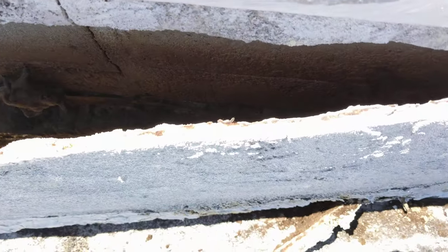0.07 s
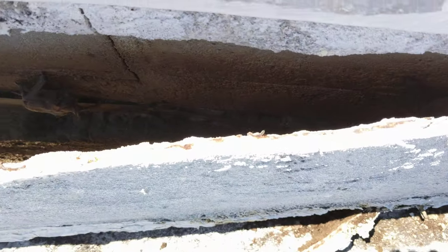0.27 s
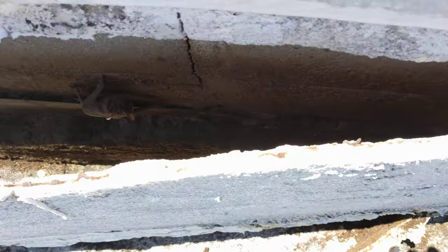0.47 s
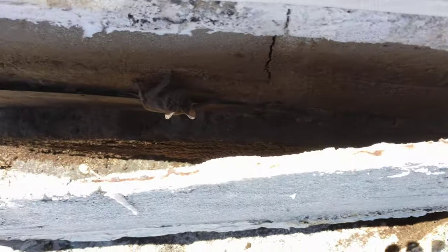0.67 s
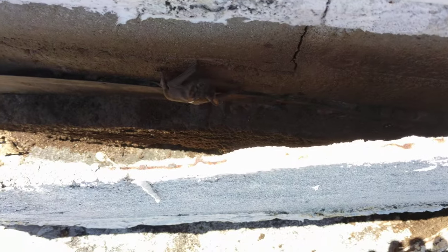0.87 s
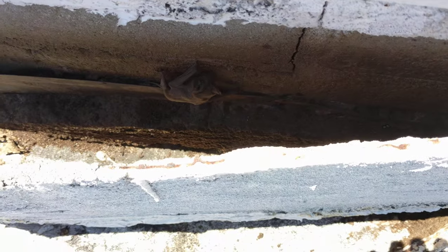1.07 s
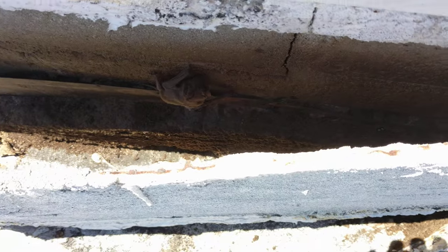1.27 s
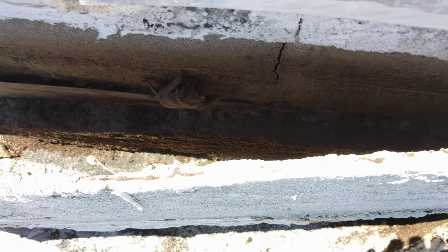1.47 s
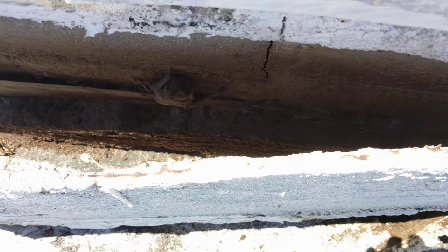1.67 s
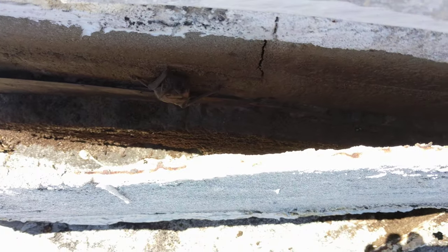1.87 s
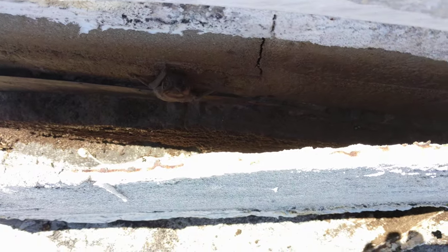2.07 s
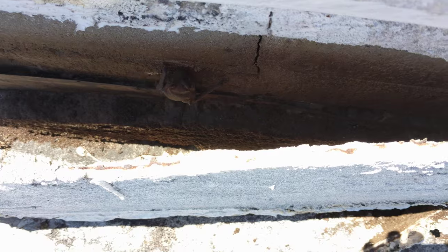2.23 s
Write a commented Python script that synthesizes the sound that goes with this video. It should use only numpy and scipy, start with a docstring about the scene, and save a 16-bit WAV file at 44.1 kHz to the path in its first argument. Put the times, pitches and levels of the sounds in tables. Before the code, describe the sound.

A bat squeaks close by in a narrow gap under a roof edge. Thin chirps come first, then raspy squeaks that turn short and clean. Its claws scratch faintly, and small thumps jolt the microphone over a low rumble.

```python
"""Bat scolding under a roof edge

A bat in a narrow gap squeaks close by, using thin membranes in its voice box. Its first squeaks are
long and break into a rasp, the later ones short and clean, with thin chirps and whistles around them.
Its claws scratch, small knocks jolt the microphone, and a low background rumble and two far peeps lie
behind."""
import sys
import numpy as np
from scipy import signal
from scipy.fft import rfft, irfft
from scipy.io import wavfile

SR = 44100
rng = np.random.default_rng(int(sys.argv[2]) if len(sys.argv) > 2 else 0)


def dump(signal):
    """Clip the signal to [-1, 1] and save it as 16-bit WAV at the path in sys.argv[1]."""
    limited = np.clip(np.atleast_2d(signal).T, -1, 1)
    pcm = np.round(limited * 32767).astype(np.int16)
    wavfile.write(sys.argv[1], SR, pcm)


N = 101429

# Tone colour of the rasp in the bat's throat: f/Hz, relative level/dB
RASP_COLOUR = [(1000, -13.5), (2000, -12.5), (2800, -12), (4200, -4), (4950, -18.5), (5600, -8.5),
               (6600, -21.5), (7900, 0), (9300, -4.5), (10700, 0), (12200, -8), (14000, 6.5), (15800, -0.5),
               (17000, -37)]
FADE_S = 0.00189  # fade at each end of a squeak or whistle
JITTER_HZ, WOBBLE_HZ = 670, 172  # speeds of the fast and the slower shaking of a voice


def squeak(length, from_hz, to_hz, db, octave_db, treble_db, rough, swell_db):
    """Voice membranes sing an arched glide; under strain they shake, add in-between tones and rasp."""
    # How the throat colours the high overtones: f/Hz, gain/dB
    throat = [(7500, -29), (9500, -9.5), (10500, -19.5), (12000, -7), (13200, -16), (14500, -3),
              (15600, -11), (17000, -40)]
    progress, fade = note_shape(length)
    n = len(progress)
    glide = from_hz + (to_hz - from_hz) * progress ** 0.745
    arch = np.sqrt(fade * np.sin(np.pi * progress).clip(0)) - np.pi / 4
    jitter = 0.06 * rough * drift(JITTER_HZ, n)
    wobble = 0.05 * np.sqrt(rough) * drift(WOBBLE_HZ, n)
    hz = glide * (1 + 0.019 * arch) * (1 + jitter + wobble)
    core = tone(hz) + amp(octave_db) * tone(2 * hz)
    overtones = sum(gain_at(throat, k * hz) * (k * hz < SR / 2) * tone(k * hz) for k in range(3, 7))
    # A strained voice splits into extra tones at thirds of its pitch.
    thirds = [k / 3 for k in range(2, 15) if k % 3]
    split = sum(gain_at(RASP_COLOUR, k * hz) * drift(WOBBLE_HZ, n) * tone(k * hz) for k in thirds)
    rasp = amp(2) * noise(RASP_COLOUR, n) + 0.44 * split
    treble = np.sqrt(1 - rough ** 2) * overtones + (rough + 0.05) * rasp
    flutter = unit(amp(1.5 * np.sqrt(rough) * drift(rate_hz=350, size=n)))
    loudness = amp(db + swell_db * (progress - 0.5)) * fade * flutter
    return loudness * (core + amp(treble_db) * treble)


def chirp(length, end_hz, db, top_hz=16200):
    """A thin call that dives from the upper edge of hearing, with a little rasp."""
    n = round(length * SR)
    progress = np.linspace(0, 1, n)
    hz = end_hz + (top_hz - end_hz) * (1 - progress) ** 2.1
    sweep = tone(hz * (1 + 0.021 * drift(JITTER_HZ, n)))
    fade = np.sin(np.pi * progress ** 0.62) ** 2
    return amp(db) * fade * (sweep + amp(-15) * noise(RASP_COLOUR, n))


def whistle(length, ends_hz, low_hz, db):
    """A thin, pure note whose pitch sags and rises again."""
    progress, fade = note_shape(length)
    hz = low_hz + (ends_hz - low_hz) * (2 * progress - 1) ** 2
    return amp(db) * fade * tone(hz * (1 + 0.025 * drift(JITTER_HZ, len(hz))))


def scratch(decay_s, db):
    """A claw catches on the rough wall and makes a dying puff of noise."""
    # Tone colour of a claw on the wall: f/Hz, relative level/dB
    claw_colour = [(300, -27), (1200, 12), (2600, 8), (5000, 2), (8000, -5.5), (12000, 0), (16000, -12.5)]
    t = np.arange(0, 2 * decay_s, 1 / SR)
    return amp(db) * np.exp(-2 * t / decay_s) * noise(claw_colour, len(t))


def gap_echo(sound, echo_db=-23, ring_s=0.053):
    """Sound bounces between the close walls, which adds a very short ring."""
    t = np.arange(SR // 10) / SR
    tail = rng.standard_normal(len(t)) * die_away(t, ring_s)
    return sound + amp(echo_db) * signal.fftconvolve(sound, tail / np.linalg.norm(tail))[:N]


def knocks(bass_cut_hz=52.5, top_hz=4270, clack_s=1.8829):
    """Jolts are pressure steps that the microphone's bass cut turns into thumps; one cluster clacks."""
    # Jolts on the microphone: t/s, level/dB, push (+1) or pull (-1)
    jolts = [(.7565, -46, 1), (.8623, -16.5, 1), (0.9986, -35, 1), (1.7368, -39.5, -1), (1.7433, -22.5, 1),
             (1.8827, -21, 1), (1.88295, -19, -1), (1.8836, -30, 1), (1.8844, -32.5, 1), (1.898, -47, 1),
             (2.0195, -19, -1), (2.1781, -34.5, 1)]
    # Ringing tones of the clack: f/Hz, level/dB, time to fall by 60 dB/s
    clack_tones = [(1560, -42.5, 0.023), (2630, -67, 0.027), (3520, -32, 0.0091)]
    steps = np.zeros(N)
    for start, db, direction in jolts:
        add(steps, start, np.full(N, amp(db) * direction))
    thumps = signal.sosfilt(signal.butter(6, bass_cut_hz, "high", fs=SR, output="sos"), steps)
    thumps = signal.sosfilt(signal.butter(1, top_hz, fs=SR, output="sos"), thumps)
    t = np.arange(SR // 10) / SR
    for hz, db, ring_s in clack_tones:
        add(thumps, clack_s, amp(db) * die_away(t, ring_s) * np.sin(2 * np.pi * hz * t))
    return thumps


def peep(length, hz, db):
    """A soft, far-away note that rises and falls."""
    arch = np.sin(np.pi * np.linspace(0, 1, round(length * SR)))
    bend = 1 + 0.049 * (arch - 1) + 0.053 * drift(JITTER_HZ, len(arch))
    return amp(db) * arch * tone(hz * bend)


def background(hum_hz=74.8, hum_db=-58.5):
    """Background rumble and hiss, with a wavering low hum that swells along with the rumble."""
    # Tone colour of the background noise: f/Hz, relative level/dB
    colour = [(20, -73), (32, -20), (48, 1.5), (65, -3), (100, -1.5), (150, -3), (220, -9.5), (320, -11),
              (520, -16.5), (680, -19), (800, -16), (1050, -21), (1500, -20.5), (2000, -26), (3400, -27),
              (5700, -33.5), (8400, -36.5), (13800, -37.5), (15500, -35), (17000, -27.5)]
    # Its loudness in three bands, briefly ducking just after the last squeak:
    # t/s, low/dB, middle/dB, high/dB
    band_levels = [(0, -56, -60, -59.5), (.28, -52, -61, -67.5), (.45, -54, -60.5, -65.5),
                   (.62, -53.5, -59.5, -65), (.78, -59, -64.5, -68), (1.0, -56, -64, -66.5),
                   (1.2, -58.5, -65.5, -71), (1.5, -57, -63, -67), (1.7, -61, -65, -70.5),
                   (1.83, -61, -70.5, -72.5), (1.99, -58, -63.5, -70.5), (2.075, -63.5, -71.5, -79.5),
                   (2.15, -63.5, -65.5, -73), (2.25, -54, -61.5, -68), (2.3, -60, -63.5, -62.5)]
    edges_hz = (0, 300, 5000, SR)
    times, *levels = np.transpose(band_levels)
    gains = [amp(np.interp(np.arange(N) / SR, times, db)) for db in levels]
    bands = sum(gain * noise(colour, N, lo, hi) for gain, lo, hi in zip(gains, edges_hz, edges_hz[1:]))
    hum = tone(hum_hz * (1 + 0.0713 * drift(rate_hz=13.6, size=N)))
    return bands + amp(hum_db) * unit(gains[0]) * hum


def amp(db):
    """Turns decibels into a gain to multiply by."""
    return 10 ** (np.asarray(db) / 20)


def unit(x):
    """Scales a signal to an average strength (rms) of 1."""
    return x / np.sqrt(np.mean(x ** 2) + 1e-20)


def gain_at(colour, hz):
    """Looks up the gain of a tone colour at a frequency."""
    points_hz, db = np.transpose(colour)
    return amp(np.interp(np.log(hz + 1), np.log(points_hz + 1), db))


def add(mix, start_s, sound):
    """Mixes a sound in at a given time."""
    part = mix[max(round(start_s * SR), 0):][:len(sound)]
    part += sound[:len(part)]


def noise(colour, size, lo_hz=0, hi_hz=SR):
    """Noise with a given tone colour, between two frequencies."""
    span = max(size, 4096)
    hz = np.fft.rfftfreq(span, 1 / SR)
    spectrum = rfft(rng.standard_normal(span)) * gain_at(colour, hz)
    return unit(irfft(spectrum * (hz >= lo_hz) * (hz < hi_hz), span))[:size]


def drift(rate_hz, size):
    """A smooth random wander of about 1 either way; a higher rate makes it faster."""
    span = max(size, 8192)
    hz = np.fft.rfftfreq(span, 1 / SR)
    spectrum = rfft(rng.standard_normal(span)) * np.exp(-(hz / rate_hz) ** 2)
    return unit(irfft(spectrum, span))[:size]


def note_shape(length):
    """Progress from 0 to 1 through a note, and a curve that fades it in and out."""
    t = np.arange(0, length + FADE_S, 1 / SR)
    edge = np.clip(np.minimum(t, t[-1] - t) / FADE_S, 0, 1)
    return t / t[-1], np.sin(np.pi / 2 * edge)


def die_away(t, ring_s):
    """A fade that falls by 60 dB in ring_s seconds."""
    return np.exp(-np.log(1000) * t / ring_s)


def tone(hz):
    """A pure tone that follows a pitch curve."""
    return np.sqrt(2) * np.sin(2 * np.pi * np.cumsum(hz) / SR)


def scene(ticks_per_s=51):
    """The bat in its gap, with the knocks and the background, in mono."""
    # The bat's squeaks; rows that touch in time form one call: t/s, length/s, start f/Hz, end f/Hz,
    # level/dB, octave gain/dB, treble gain/dB, roughness (0-1), swell over the note/dB
    squeaks = [ (0.667, 0.012, 4300, 3910, -43.5, 5, 9, 0.17, -8),
               (0.679, 0.03, 4190, 3670, -55, -11.5, 13.5, 0.77, -5),
               (0.709, 0.013, 2650, 2570, -51.5, -13, 24, 0.07, 3),
               (0.723, 0.009, 3540, 3480, -56, -14, 20, 0.35, -4),
               (0.8244, 0.0087, 4370, 3860, -47.5, 7, 5, 0.18, 11),
               (0.8347, 0.011, 4240, 3970, -46.5, -9, 5, 0.65, -8),
               (0.846, 0.031, 4010, 3530, -48, -15, 9, 0.45, -10),
               (0.868, 0.012, 4080, 3940, -46.5, 1, -7, 0.17, 4),
               (0.881, 0.0098, 3600, 3780, -46.5, -8, -2, 0.6, -11),
               (1.0065, 0.013, 3800, 4370, -44.5, -5, 0.5, 0.24, -3),
               (1.020, .026, 3950, 4124, -46.5, -17, -2, 0.83, -4),
               (1.046, .013, 3680, 3550, -51, -7, -2, 0.4, -3),
               (1.1772, 0.0068, 3646, 3590, -45, -8, -1, 0.23, -7),
               (1.3189, .025, 3950, 3730, -50, -4, 9.5, 0.06, -9),
               (1.4623, 0.0047, 3430, 3200, -48, -12, -1, 0.5, 11),
               (1.473, 0.019, 3850, 3850, -43, 2.5, 9.5, 0.14, -0.5),
               (1.617, .016, 3960, 3670, -44.5, -3, 1, 0.29, -4.5),
               (1.632, 0.009, 3420, 3150, -50.5, -11, -2, 0.42, 5),
               (1.745, .028, 3650, 3570, -47.5, 0, 1.5, 0.2, -1.5),
               (1.774, 0.01, 3060, 3000, -52, -11, -1.5, 0.5, -13),
               (1.889, 0.0031, 4000, 3170, -50.5, 0, -2, 0.02, -8),
               (2.0325, 0.011, 3355, 3004, -50, -9.5, 1.5, 0.26, -5)]
    # Its falling chirps: t/s, length/s, end f/Hz, level/dB
    chirps = [(.031, 0.0033, 11100, -50), (.1175, 0.0043, 11800, -53), (.197, .005, 11700, -53.5),
              (.227, 0.008, 13800, -43), (.229, 0.008, 11700, -42.5), (.239, 0.019, 13700, -49),
              (.257, .004, 14500, -49), (.2675, 0.0074, 12500, -46.5), (.3295, 0.0038, 11900, -37.5),
              (.345, 0.0085, 14000, -48), (.426, 0.0082, 13700, -50), (.5455, .007, 13800, -43),
              (.571, 0.0056, 10900, -55), (.578, 0.0039, 10000, -52), (.586, 0.0074, 11500, -52),
              (.594, 0.0036, 11500, -60), (.639, .004, 12000, -55), (.646, .004, 12100, -58),
              (.653, 0.0026, 11300, -46), (.8385, 0.0085, 15100, -37), (1.076, .005, 15200, -73),
              (1.161, .006, 14800, -63), (1.439, .004, 11000, -58), (1.457, .005, 15000, -49),
              (1.629, .005, 14700, -34), (1.7555, 0.0058, 14800, -40), (1.7605, 0.0053, 14700, -33.5),
              (1.8893, 0.0066, 15400, -36), (1.926, 0.0075, 14800, -50), (2.0412, 0.0047, 14400, -34),
              (2.266, 0.0046, 10800, -49), (2.282, 0.003, 14200, -42)]
    # Its whistles: t/s, length/s, f at both ends/Hz, lowest f/Hz, level/dB
    whistles = [(.359, 0.0075, 10900, 10200, -54), (1.455, 0.022, 16300, 13100, -50),
                (1.567, 0.017, 14200, 12700, -63), (1.607, 0.017, 13100, 12100, -47.5),
                (1.640, 0.019, 13100, 11900, -55.5), (1.778, 0.018, 13600, 10300, -58)]
    # Its claw scratches: t/s, decay/s, level/dB
    scratches = [(.0585, 0.0028, -44.5), (.077, 0.0087, -49.5), (.227, 0.014, -53), (.316, 0.01, -48),
                 (.362, .005, -52.5), (.4355, .003, -48.5), (.9455, .002, -57), (.9985, 0.0051, -50),
                 (1.166, 0.0036, -50), (1.3105, 0.0022, -49.5), (1.364, .002, -67), (1.528, .002, -56),
                 (1.550, 0.003, -67), (1.610, 0.00091, -43.5), (1.7432, 0.0041, -39), (1.9135, 0.0017, -56),
                 (2.0185, 0.0039, -48.5), (2.024, .002, -54), (2.268, 0.015, -52.5)]
    # Far peeps: t/s, length/s, f/Hz, level/dB
    peeps = [(.07, 0.062, 3580, -67), (.945, 0.044, 3480, -67)]
    mix, backdrop = np.zeros(N), background()
    for start, *row in squeaks:
        add(mix, start - FADE_S / 2, squeak(*row))
    for table, source in ((chirps, chirp), (whistles, whistle), (scratches, scratch), (peeps, peep)):
        for start, *row in table:
            add(mix, start, source(*row))
    mix = gap_echo(mix)
    # Tiny claw ticks at random times, most of them very faint.
    for when, softness in rng.random((round(ticks_per_s * N / SR), 2)):
        add(mix, when * N / SR, scratch(decay_s=0.0017, db=-73.5 - 5 * np.log(softness + 0.02)))
    return (mix + knocks() + backdrop)[None]


def record(dry, cut_hz=16350):
    """Cuts off the very highest treble."""
    low_pass = signal.firwin(255, cut_hz, window=("kaiser", 8), fs=SR)
    return signal.oaconvolve(dry, low_pass[None], "same")


dry = scene()
out = record(dry)
dump(out)
```